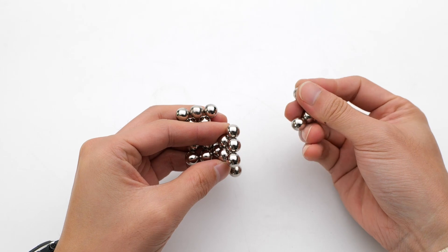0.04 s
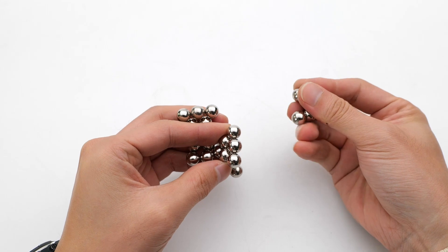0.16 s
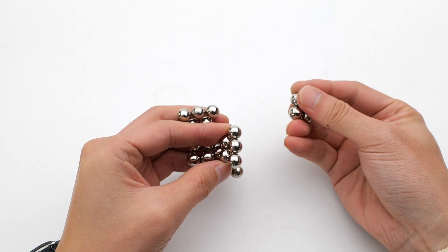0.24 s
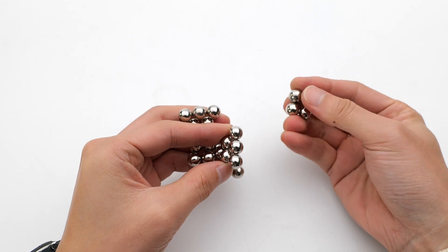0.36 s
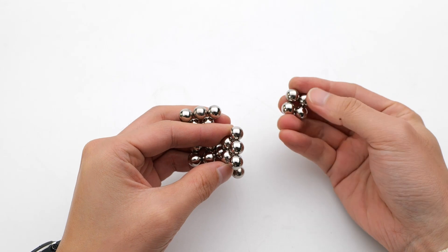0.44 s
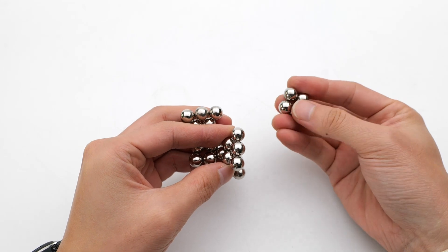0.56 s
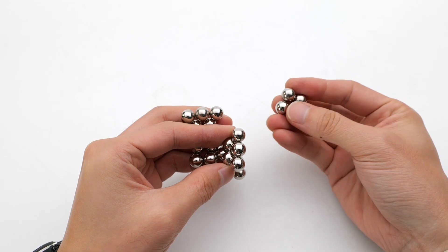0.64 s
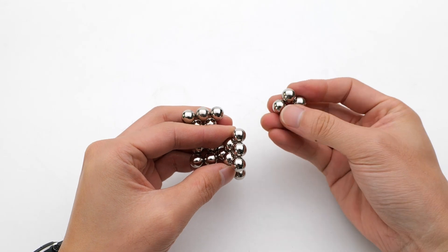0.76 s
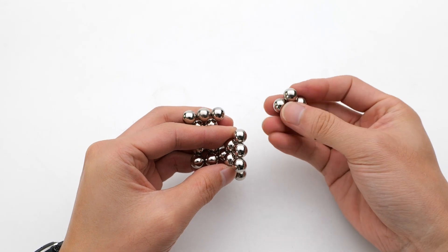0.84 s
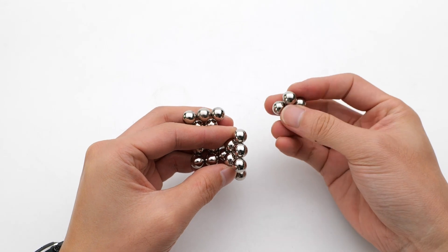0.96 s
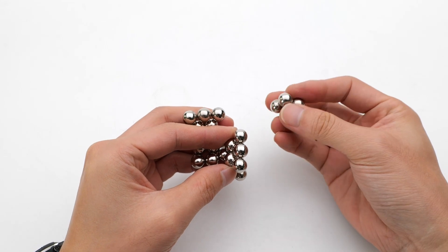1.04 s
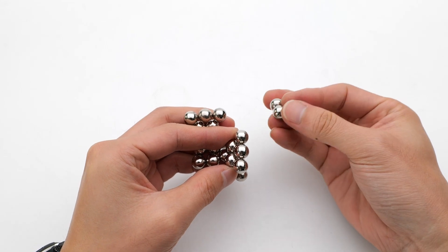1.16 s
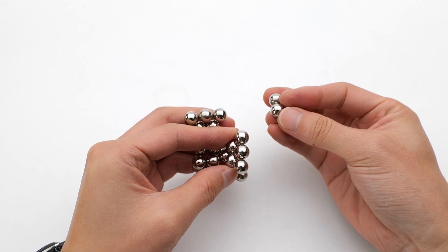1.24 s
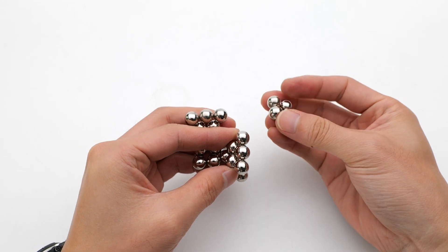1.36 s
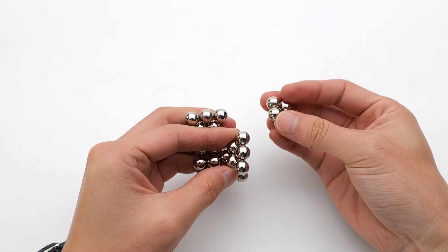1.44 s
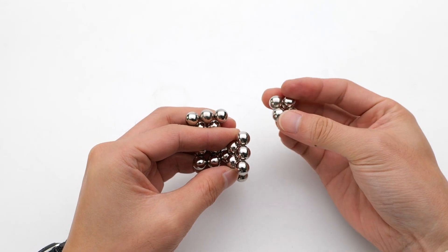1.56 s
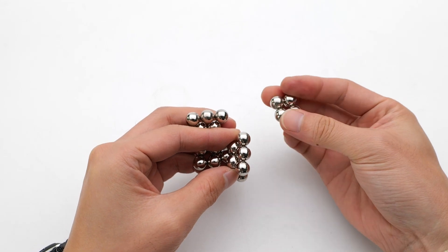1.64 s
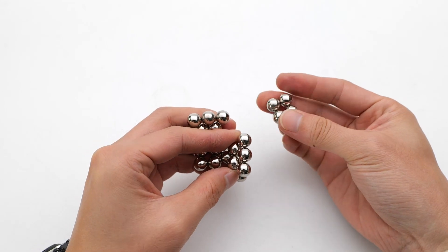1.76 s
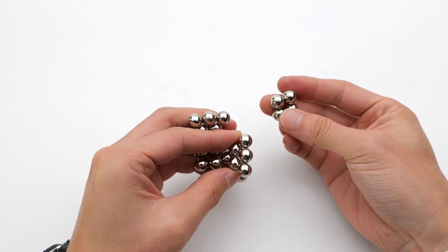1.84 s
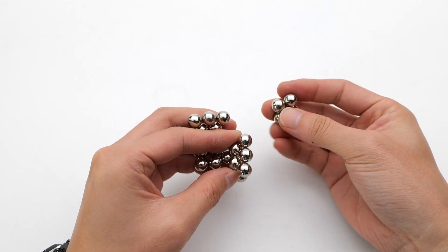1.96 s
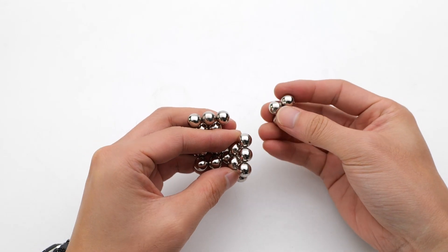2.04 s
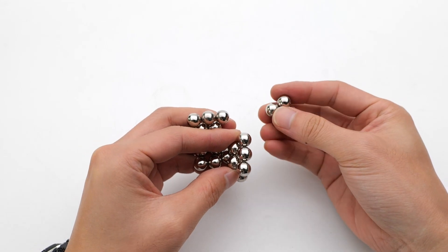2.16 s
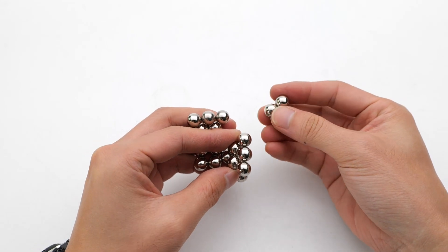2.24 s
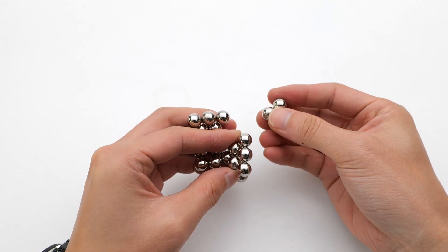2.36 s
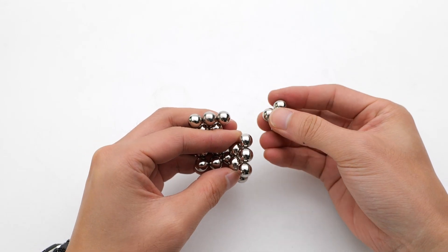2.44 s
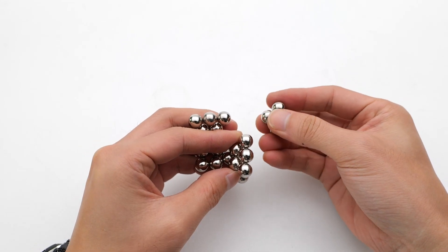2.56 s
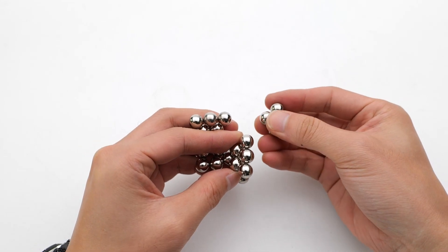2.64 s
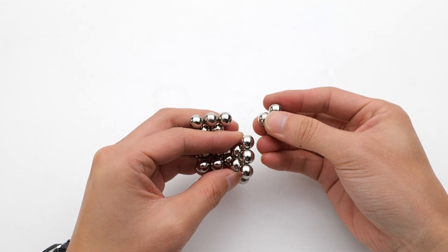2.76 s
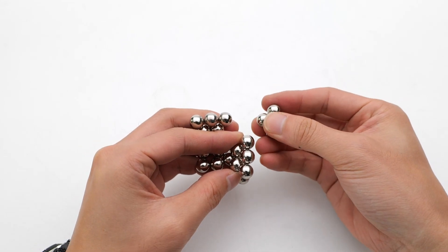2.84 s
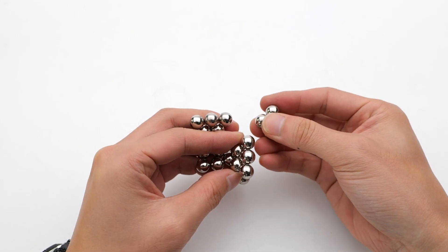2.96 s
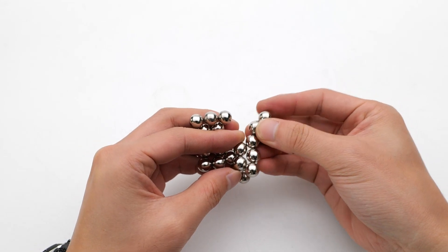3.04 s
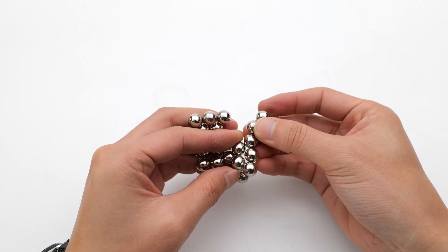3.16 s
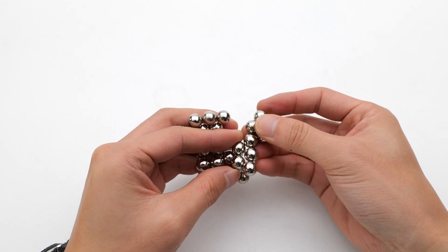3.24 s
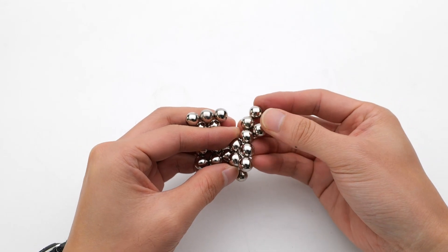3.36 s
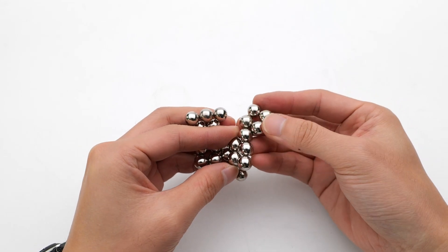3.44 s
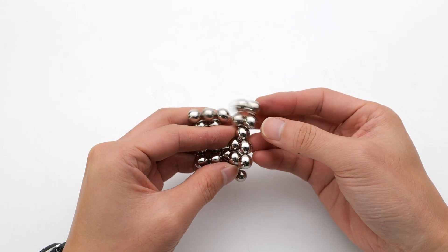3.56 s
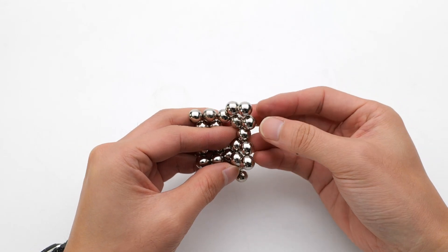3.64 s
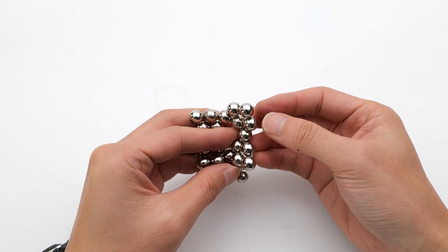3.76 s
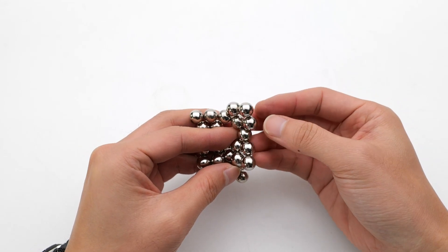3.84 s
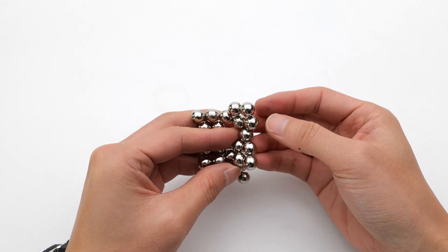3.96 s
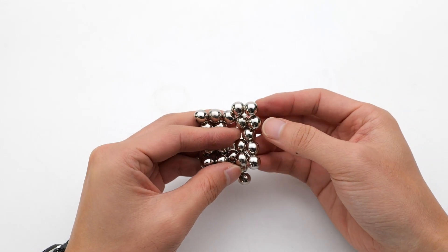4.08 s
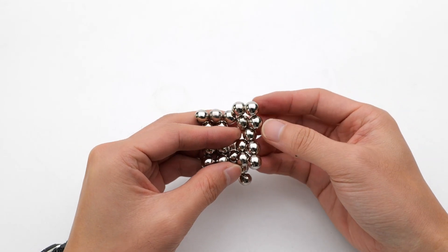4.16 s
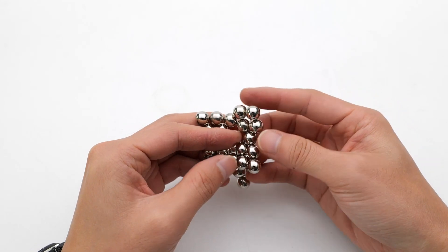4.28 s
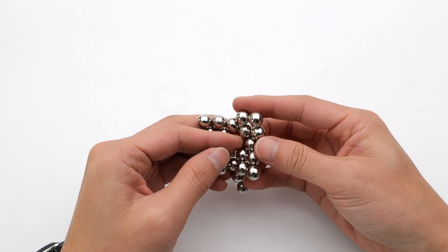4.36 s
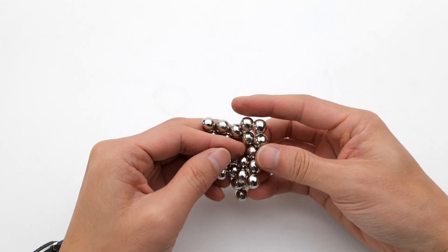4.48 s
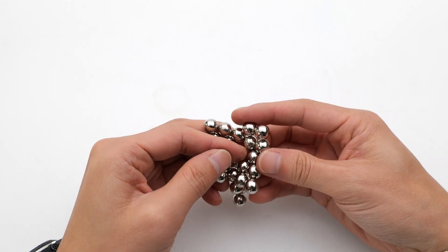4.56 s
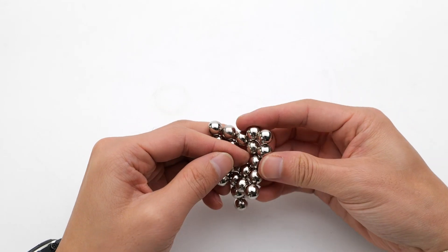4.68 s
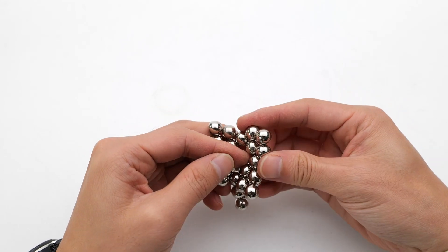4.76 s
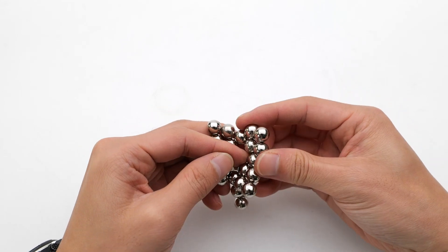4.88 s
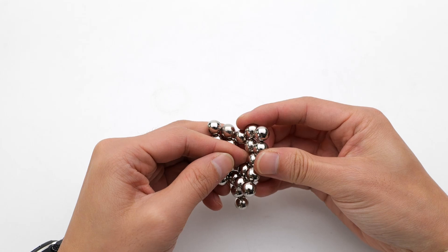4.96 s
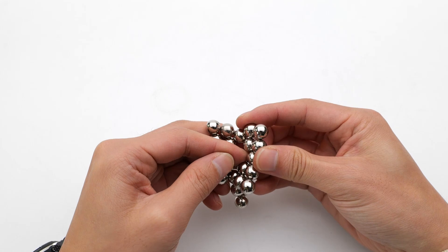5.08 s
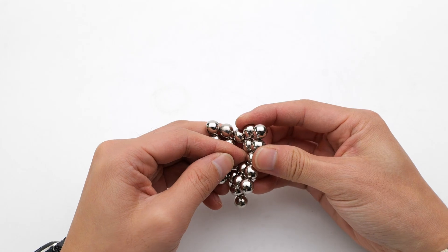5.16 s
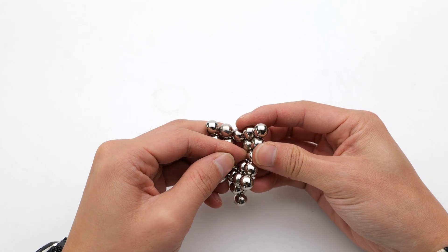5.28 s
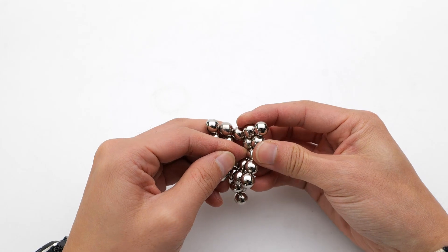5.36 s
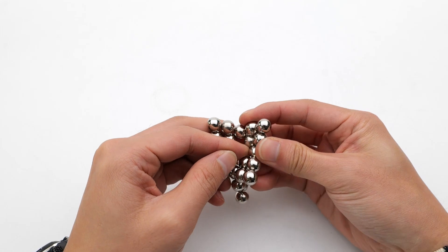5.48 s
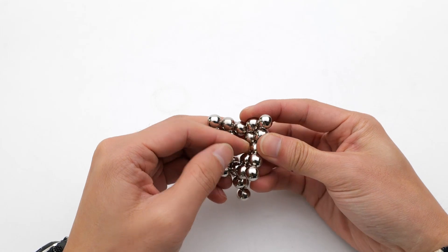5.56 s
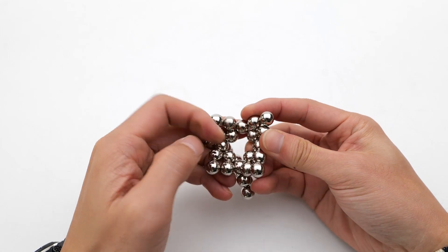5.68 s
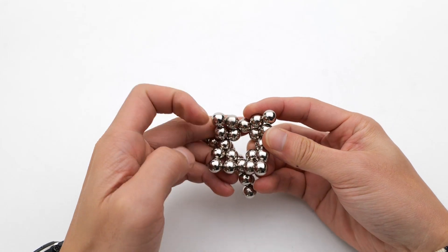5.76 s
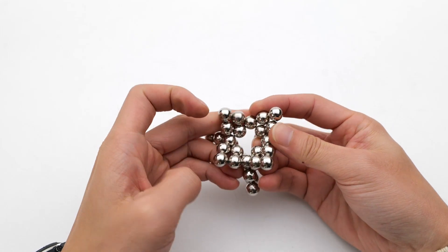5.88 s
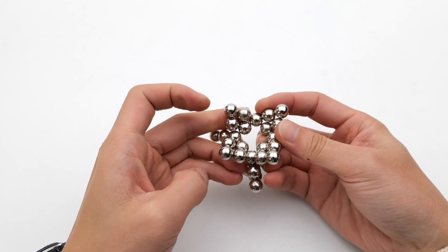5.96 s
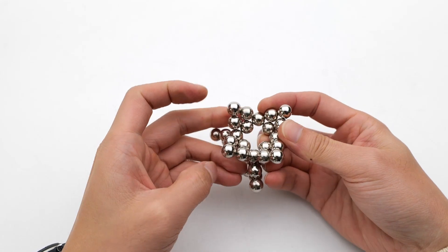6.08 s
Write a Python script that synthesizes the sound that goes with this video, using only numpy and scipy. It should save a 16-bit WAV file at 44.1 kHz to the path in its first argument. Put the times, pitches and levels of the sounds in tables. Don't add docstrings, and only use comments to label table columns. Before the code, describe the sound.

Close up in a small quiet room, steel magnet balls snap together between fingers. One hard, bright click comes almost at once, then after nearly three seconds a tight loud snap with a faint deep table thump, and another half a second later. Afterwards only tiny ticks and a faint double click remain. Short room reflections follow each snap; soft fan hum, low air rumble and hiss lie beneath.

```python
import sys
import numpy as np
from scipy import signal
from scipy.fft import rfft, irfft
from scipy.io import wavfile
from scipy.ndimage import uniform_filter1d

SR = 44100
rng = np.random.default_rng(int(sys.argv[2]) if len(sys.argv) > 2 else 0)


def to_wav(s):
    ch = np.atleast_2d(s).T
    pcm = np.round(np.clip(ch, -1, 1) * 32767)
    wavfile.write(sys.argv[1], SR, pcm.astype(np.int16))


def how_loud(loudness_db):
    steps = np.asarray(loudness_db, float) / 20
    return 10 ** steps


N = 269960
SIZE = 1 << 15
HZ = np.arange(SIZE // 2 + 1) * SR / SIZE


def snap(impacts, near, beats, returns):
    # f/Hz, level/dB
    toward_walls = [(300, -38), (1000, -29), (2500, -15.5), (3700, -14.5), (5200, -7.5), (9000, -3),
                    (13500, -3.5), (15700, -11)]
    return_db, echo_db, late_db, tilt_db = returns
    near_top_hz, near_blur_hz, far_blur_hz = 16500, 1200, 120
    grit_db, grit_s = 1.5, .00015
    side_db = -30.5

    times, levels = contacts(impacts)
    start = int(times.min() * SR) - 64
    t = np.arange(64) / SR
    grit = how_loud(grit_db) * np.exp(-t / grit_s) * rng.standard_normal((len(times), 64))
    grit[:, 0] = 1
    delay = np.exp(-2j * np.pi * HZ * (times[:, None] - start / SR))
    flurry = np.sum(how_loud(levels)[:, None] * rfft(grit, SIZE) * delay, axis=0)

    near_db = read(near, HZ) - 20 * (1 + np.tanh((HZ - near_top_hz) / 300))
    direct = coloured(flurry, near_db, near_blur_hz)

    far_db = read(toward_walls, HZ) + tilt_db * np.log2(HZ / 8000 + .02)
    for hz, width, db in beats:
        far_db = far_db + db / (1 + (2 * (HZ - hz) / width) ** 2)
    back = coloured(flurry, far_db, far_blur_hz) * how_loud(return_db)

    mid = direct + back * room(echo_db, late_db)
    side = back * room(-12.5, 8.5)
    return start, irfft(mid), irfft(side) * how_loud(side_db)


def contacts(impacts):
    rebounds = 3
    s, db, gap_ms, loss_db = np.transpose(impacts)[:, :, None]
    k = np.arange(rebounds + 1)
    times = s + k * gap_ms / 1000
    levels = db + k * loss_db
    return times.ravel(), levels.ravel()


def coloured(flurry, db, blur_hz):
    power = np.abs(flurry) ** 2
    blur = int(blur_hz * SIZE / SR)
    own = uniform_filter1d(uniform_filter1d(power, blur), blur)
    y = flurry * causal(db - 10 * np.log10(own))
    return y * np.sqrt(power.mean() / np.mean(np.abs(y) ** 2))


def causal(db):
    cepstrum = irfft(np.log(how_loud(db)))
    cepstrum[1:SIZE // 2] *= 2
    cepstrum[SIZE // 2 + 1:] = 0
    h = np.exp(rfft(cepstrum))
    return h / np.sqrt(np.mean(np.abs(h) ** 2))


def room(echo_db, late_db):
    # t/s, level/dB, smear/s
    reflections = [
        (.0028, -15, .0012),
        (.0069, 6.5, .0008),
        (.0095, -6.5, .002),
        (.0166, 0.5, .0008),
        (0.0247, -10.5, .0015),
    ]
    # f/Hz, early T60/s, late T60/s, late start level/dB
    diffuse_bands = [(1200, 0.11, 0.55, -16), (2500, 0.11, 0.34, -6), (4898, 0.13, 0.52, -15.5),
                     (8000, .11, 0.39, -15.5), (11000, .1, .27, -9), (15500, 0.075, 0.17, -14)]
    diffuse_db, build_s, top_hz = -3.0, .004, 15900

    t = np.arange(SIZE) / SR
    grain = rng.standard_normal((2, SIZE))
    h = np.zeros(SIZE)
    for s, db, smear in reflections:
        tail = (t >= s) * np.exp(-np.abs(t - s) / smear) / np.sqrt(smear * SR)
        h = h + how_loud(db + echo_db) * tail * grain[0]

    centres = np.log(np.array(diffuse_bands)[:, 0])
    build = how_loud(diffuse_db - 16.5) * (1 - np.exp(-(t / build_s) ** 2))
    for k, (_, early, late, start_db) in enumerate(diffuse_bands):
        share = np.interp(np.log(HZ + 1), centres, np.arange(len(centres)) == k)
        fade = np.hypot(how_loud(-60 * t / early), how_loud(start_db + late_db - 60 * t / late))
        h = h + irfft(rfft(grain[1]) * share) * build * fade
    return rfft(h) / (1 + (HZ / top_hz) ** 150)


def table_booms():
    # t/s, f/Hz, level/dB, rise/s, T60/s
    table_modes = [
        (.29, 98, -57.5, 0.049, .6),
        (3.115, 42, -53.5, 0.0095, .3),
        (3.114, 150, -47, 0.0031, 0.07),
        (3.115, 280, -48, 0.0022, 0.098),
        (3.115, 560, -55.5, 0.0011, 0.017),
        (3.16, 120, -58, .04, 0.55),
        (3.466, 75, -62, .05, .5),
        (3.647, 260, -52, .002, 0.044),
        (3.67, 77, -57.5, .08, 1.6),
        (3.66, 28, -58, 0.061, .6),
    ]
    return sum(damped_ring(*mode) for mode in table_modes)


def finger_ticks():
    # t/s, f/Hz, level/dB, T60/s
    ball_ticks = [
        (4.515, 8000, -52, .001),
        (5.682, 4200, -59, .004),
        (5.986, 9000, -54, .001),
    ]
    return sum(damped_ring(s, hz, db, .0001, t60) for s, hz, db, t60 in ball_ticks)


def damped_ring(s, hz, db, rise, t60):
    age = np.maximum(np.arange(N) / SR - s, 0)
    envelope = how_loud(db - 60 * age / t60) * (1 - np.exp(-age / rise))
    return envelope * np.sin(2 * np.pi * hz * age)


def fan():
    # f/Hz, width/Hz, level/dB
    housing = [(197, 34, -70), (220.3, 17, -72.5), (302, 47, -80), (352, 29, -85.5), (507, 71, -78),
               (662.4, 17, -86.5), (875.3, 55, -77), (1116, 360, -79.5), (1576, 40, -88.5)]
    # f/Hz, rms level/dB, waver/dB
    motor_lines = [(49.2, -70.5, -11), (149.9, -80, -12), (1116.7, -81, -13.5), (1176, -92, -14.5)]
    t = np.arange(N) / SR
    y = np.zeros(N)
    for centre, width, db in housing:
        y = y + noise(lambda f: 1 / (1 + (2 * (f - centre) / width) ** 2), db)
    for hz, db, waver_db in motor_lines:
        waver = noise(lambda f: 1 / (1 + (f / 4.0) ** 2), waver_db)
        line = np.sin(2 * np.pi * (hz * t + rng.random()))
        y = y + np.sqrt(2) * how_loud(db) * (1 + waver) * line
    return y


def room_air():
    # f/Hz, level/dB per Hz
    air_density = [(20, 1), (55, -8.5), (115, -7.5), (260, -9.5), (600, -18), (1000, -17.5), (2800, -28.5),
                   (7000, -37.5)]
    # f/Hz, level/dB
    air_width = [(60, -20), (110, -16), (200, -27), (380, -15), (1000, -18), (2380, -11.5), (8120, -2),
                 (15000, 0.5)]
    level_db = -66.5
    mid = noise(lambda f: how_loud(read(air_density, f)), level_db)
    side = noise(lambda f: how_loud(read(air_density, f) + read(air_width, f)), level_db - 14.0)
    return mid, side


def amplifier_hiss():
    level_db, tilt_db, top_hz = -76.5, -.1, 15700
    return noise(lambda f: how_loud(tilt_db * np.log2(f / 4000 + .05)) * (f < top_hz), level_db)


def noise(gain, db):
    hz = np.arange(N // 2 + 1) * SR / N
    y = irfft(rfft(rng.standard_normal(N)) * gain(hz), N)
    return y * how_loud(db) / y.std()


def read(points, hz):
    p = np.array(points, float)
    return np.interp(np.log(hz + 1), np.log(p[:, 0]), p[:, 1])


def scene():
    # t/s, level/dB, rebound gap/ms, change per rebound/dB
    snap_impacts = [
        [(.26752, 1.5, .86, -3), (.26893, -3, .55, -5), (.27063, -9, .34, -10)],
        [(3.1147, -8, .3, -12), (3.115, -2, .25, 1), (3.11595, -4, .27, -4.5)],
        [(3.6463, -8, .35, .5), (3.64841, -2, .38, -2.5), (3.64999, -9, .43, -8.5)],
        [(5.3551, -24, .15, -3), (5.35544, -20, .5, -13.5)],
    ]
    # f/Hz, level/dB
    snap_near = [
        [(400, -33.5), (1400, -34.5), (2600, -21.5), (3750, -31.5), (7400, -13), (9300, -.5), (12200, -8),
         (16300, -18)],
        [(1100, -35), (2500, -13.5), (5400, -14), (7100, -23), (8700, 0), (9600, -9.5), (13000, -5),
         (16300, -20)],
        [(800, -38), (2000, -17), (3100, -27), (4500, -3.5), (6000, -11.5), (11000, -2.5), (15000, -4.5),
         (16300, -27)],
        [(600, -30), (1800, -14), (2700, -13), (4000, -24), (5300, -7), (12800, -10), (14800, 3), (16300, -16)],
    ]
    # f/Hz, width/Hz, level/dB
    snap_beats = [
        [(1700, 400, -8), (2250, 300, 4), (3003, 520, -6.5), (3950, 260, -17.5), (5300, 200, -20),
         (5720, 200, 9.5), (6250, 400, -16), (7820, 170, 10), (8300, 200, -10), (9170, 150, 11),
         (10300, 150, -14), (11000, 200, -24), (11900, 250, -14), (13600, 300, 5)],
        [(4500, 300, 4), (7440, 300, -9), (8620, 600, 6), (11100, 500, -6), (13060, 400, -5.5)],
        [(1860, 160, -10.5), (4410, 200, 10), (4640, 100, 10), (4800, 100, 11), (5230, 200, 7),
         (6450, 150, 3.5), (9950, 170, -2), (14390, 1500, 4.5)],
        [(4000, 700, -9), (8500, 4400, -8), (14840, 2000, 6)],
    ]
    # all/dB, single returns/dB, late sound/dB, hand-shading tilt/dB per octave
    snap_returns = [
        (-12.5, 0, 0.5, 2.5),
        (-11.5, -4, -1.5, -0.5),
        (-8, -4.5, -4, -0.2),
        (-14, 0, -3, -1.8),
    ]

    air_mid, air_side = room_air()
    mid = air_mid + fan() + table_booms() + finger_ticks()
    mid, side = np.append(mid, np.zeros(SIZE)), np.append(air_side, np.zeros(SIZE))
    for parts in zip(snap_impacts, snap_near, snap_beats, snap_returns):
        start, snap_mid, snap_side = snap(*parts)
        mid[start:start + SIZE] += snap_mid
        side[start:start + SIZE] += snap_side
    return np.array([mid + side, mid - side])[:, :N]


def roll_off(x):
    return signal.sosfilt(signal.butter(12, 15750, fs=SR, output="sos"), x)


def record(dry):
    hiss = [amplifier_hiss() for _ in dry]
    return roll_off(np.clip(dry + hiss, -1, 1))


dry = scene()
out = record(dry)
to_wav(out)
```